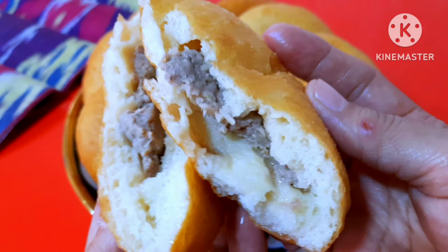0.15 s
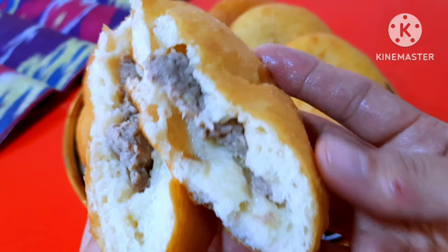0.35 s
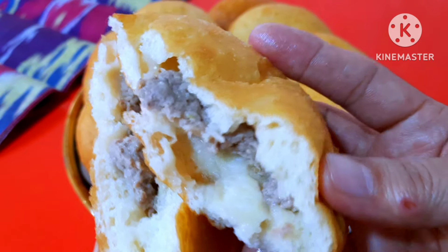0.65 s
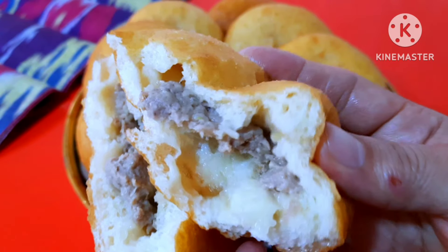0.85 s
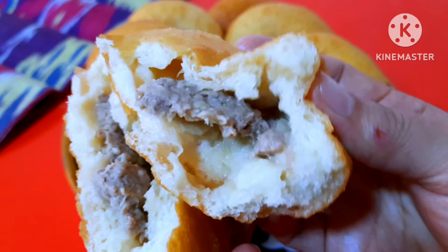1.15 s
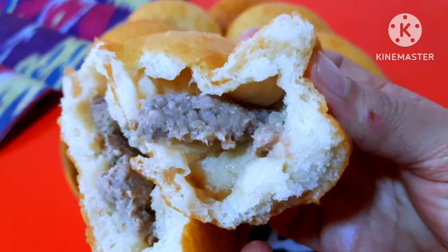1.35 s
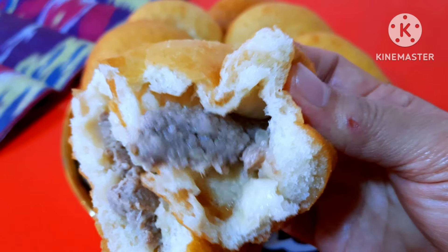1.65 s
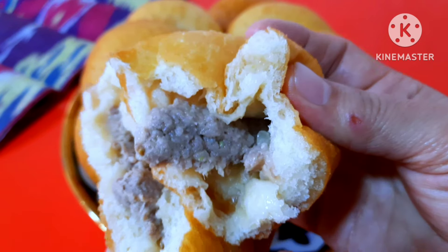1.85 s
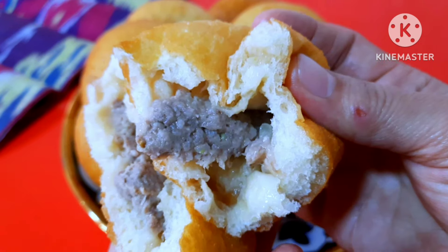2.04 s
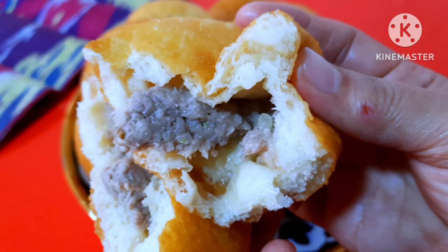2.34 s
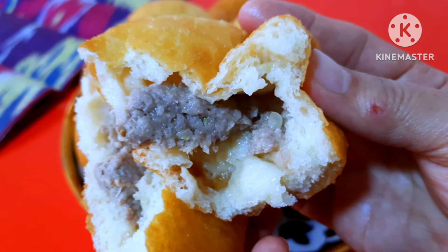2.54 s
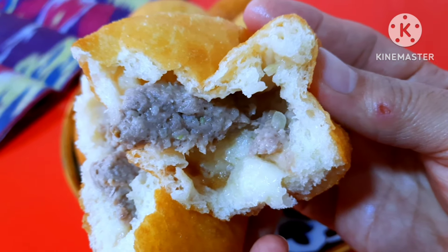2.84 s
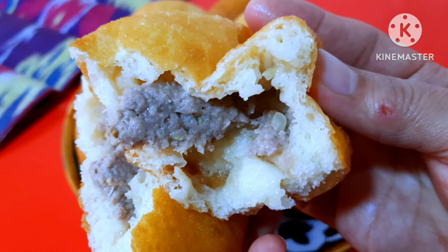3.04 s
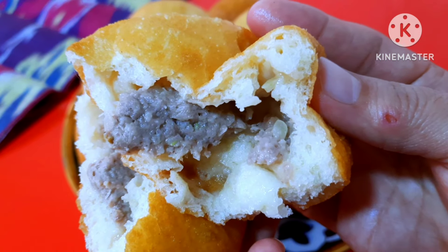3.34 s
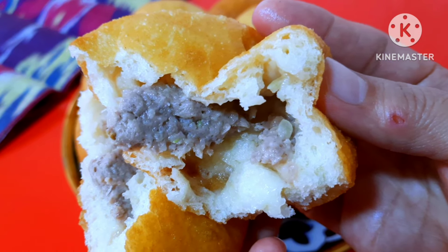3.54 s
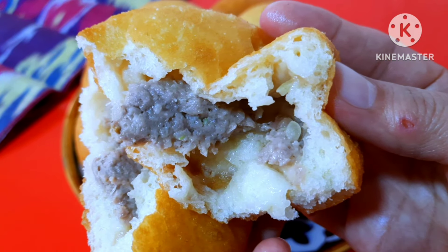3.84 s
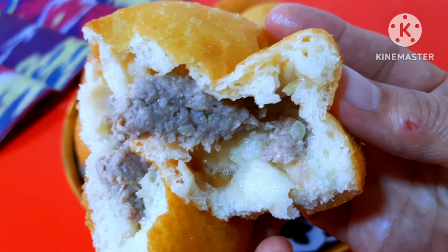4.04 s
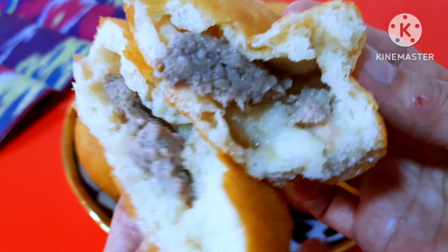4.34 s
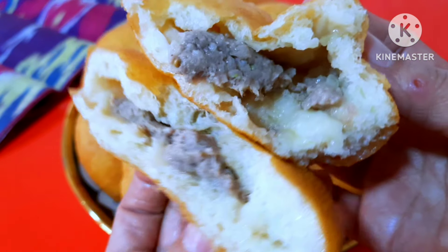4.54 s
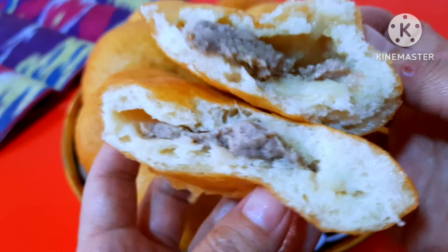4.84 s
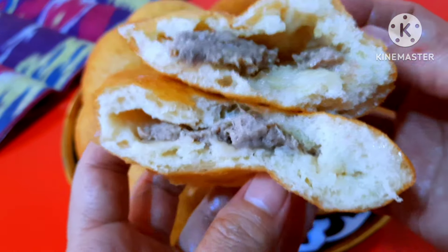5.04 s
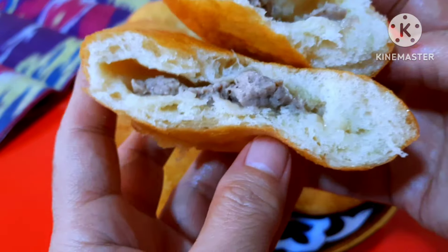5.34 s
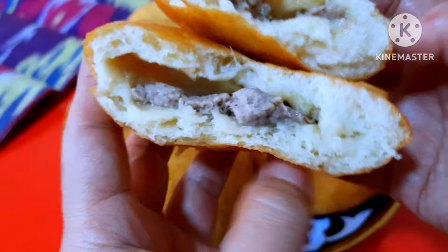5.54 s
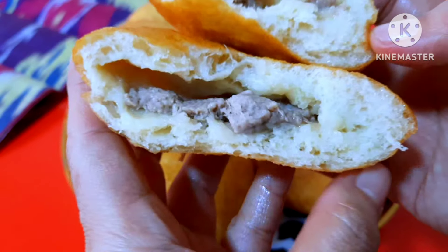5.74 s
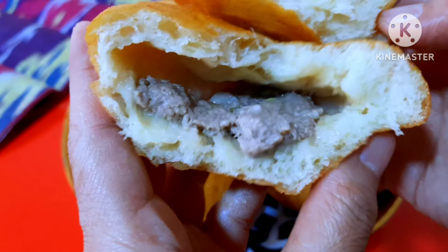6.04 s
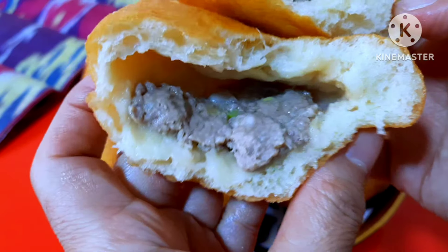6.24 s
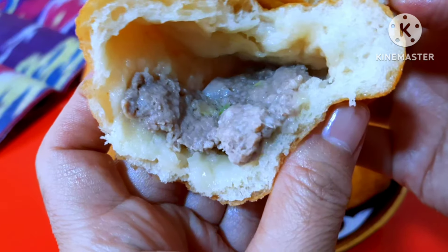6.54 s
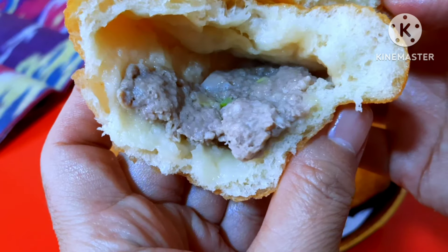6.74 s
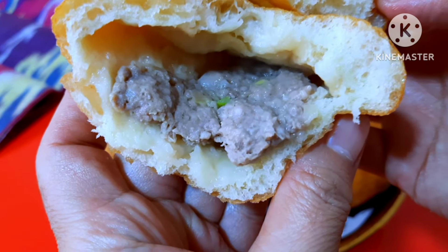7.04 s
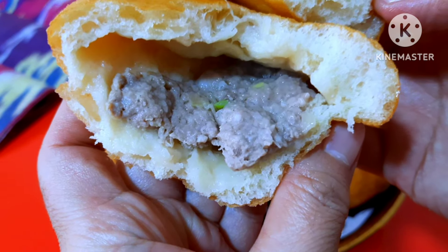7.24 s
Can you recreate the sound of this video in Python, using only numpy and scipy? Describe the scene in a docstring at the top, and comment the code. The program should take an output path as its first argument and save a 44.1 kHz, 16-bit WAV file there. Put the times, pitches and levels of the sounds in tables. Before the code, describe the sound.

Hands tear open a fried dough pie up close, soft crumb ripping and thin crust snapping over a steady low hum

```python
"""Hands pull a fried dough pie close to a phone: from the start the crumb tears in dull bursts of grainy noise
and tiny crust pops ring for a few cycles, over low outdoor rumble, hiss and a motor hum of three wavering sines.
Soon the crust snaps: a knock of the shell with a bright crack. Near 2.7 s a far bird chirps in gliding whistles;
the hands then nearly rest, and from about 4 s they tear and snap densely again before a last soft pull and chirp."""
import sys
import numpy as np
from scipy import signal
from scipy.fft import rfft, irfft, next_fast_len
from scipy.io import wavfile
from scipy.ndimage import uniform_filter1d, map_coordinates

SR = 44100
rng = np.random.default_rng(int(sys.argv[2]) if len(sys.argv) > 2 else 0)


def wav_record(signal):
    """Record a signal, one row per channel, as 16-bit PCM in the file named by sys.argv[1]."""
    frames = np.transpose(np.atleast_2d(signal))
    bounded = np.clip(frames, -1, 1)
    # unit amplitude maps onto the largest positive 16-bit level
    quanta = np.round(bounded * 32767).astype(np.int16)
    wavfile.write(sys.argv[1], SR, quanta)


N = 325458
LAG_S = .00015  # scale of the random time offset between the two ports


def amp(db):
    """Decibels to linear amplitude."""
    return 10 ** (np.asarray(db) / 20)


def unit(x):
    """Scale to an rms of 1."""
    return x / np.sqrt(np.mean(x ** 2) + 1e-20)


def along(points, hz):
    """Read a curve of (Hz, value) points on a log frequency axis."""
    point_hz, values = np.transpose(points)
    return np.interp(np.log(hz + 1), np.log(point_hz + 1), values)


def curves(rows):
    """One value per sample for each column after the time."""
    times_s, *columns = np.transpose(rows)
    return [np.interp(np.arange(N) / SR, times_s, column) for column in columns]


def wobble(rate):
    """A smooth random curve, rate knots a second."""
    knots = rng.standard_normal(int(N * rate / SR) + 4)
    return map_coordinates(knots, [np.arange(N) * rate / SR])


def filtered(x, response):
    """Multiply the spectrum of x by a response given as a function of frequency."""
    m = next_fast_len(N + SR // 2)
    return irfft(rfft(x, m) * response(np.fft.rfftfreq(m, 1 / SR)), m)[..., :N]


def spread(pair, gain, alike):
    """Mix two unrelated signals into a coloured left and right of joint rms 1, as alike as the curve asks."""
    def mid_side_gain(hz):
        turn = np.arccos(np.clip(along(alike, hz), -1, 1)) / 2
        return gain(hz) * np.array([np.cos(turn), np.sin(turn)])

    mid, side = filtered(pair, mid_side_gain)
    return unit(np.array([mid + side, mid - side]))


def bursts():
    """Envelopes of body, crumb, crust and fizz: each tear swells and fades as a bell, and powers add."""
    # tears of the dough: peak_s, length_s, crumb_level_db, dryness_db (crust over crumb)
    tears = [(0, 0.058, -40, -4), (0.138, 0.17, -67.5, -2.5), (0.279, 0.1, -52, -5.5),
             (0.33, 0.056, -46, -5.5), (0.377, 0.091, -58, -20), (0.467, .066, -53, 2.5),
             (0.579, 0.047, -58, 7), (0.658, 0.031, -51.5, -1), (0.712, 0.066, -46, -6.5),
             (0.782, .043, -46.5, -5.5), (0.852, 0.056, -60, -1), (0.953, 0.1, -64, 8),
             (1.063, 0.043, -48, 3.5), (1.177, 0.074, -55, 6.5), (1.221, 0.038, -60, 12.5),
             (1.331, 0.08, -60.5, 8.5), (1.457, 0.058, -68.5, 10.5), (1.575, 0.092, -58.5, 4),
             (1.698, .041, -64.5, 8), (1.771, .05, -57.5, 3.5), (1.812, 0.057, -60, 8),
             (1.937, 0.2, -70.5, 5), (2.221, 0.036, -55, -12), (2.36, 0.28, -71, 5),
             (2.471, .087, -63.5, -2), (2.544, 0.053, -64, 0.5), (2.643, .063, -69.5, -4),
             (2.713, 0.1, -77, 9), (3.692, 0.034, -63.5, -8), (4.048, 0.039, -62, -20),
             (4.157, 0.074, -64, -0.5), (4.267, 0.037, -48.5, 0), (4.322, 0.047, -56.5, 3.5),
             (4.375, 0.024, -53, 3.5), (4.42, 0.071, -59.5, 0.5), (4.526, 0.065, -71.5, 14),
             (4.597, 0.043, -45, -4.5), (4.723, 0.056, -39, -2), (4.784, 0.085, -47, -4),
             (4.879, 0.038, -42.5, -4), (4.932, 0.051, -57, -2), (4.991, 0.016, -47, 3.5),
             (5.028, 0.062, -60.5, 4.5), (5.142, 0.051, -51, 2), (5.183, 0.056, -40, -0.5),
             (5.285, 0.043, -49.5, 0), (5.35, 0.079, -70.5, 11.5), (5.467, 0.16, -67.5, 2.5),
             (5.554, 0.084, -56.5, 4), (5.639, .068, -43, 3.5), (5.746, 0.048, -56, 5),
             (5.79, .095, -60.5, 10), (5.871, 0.049, -58.5, 10), (5.986, 0.055, -60, 3),
             (6.034, 0.042, -47, 1.5), (6.123, 0.043, -41, 2.5), (6.206, 0.098, -58, 1),
             (6.252, 0.083, -55, 0.5), (6.36, 0.12, -77.5, 13.5), (6.485, 0.075, -56, -1),
             (6.529, 0.05, -54, 3.5), (6.595, 0.06, -71.5, 11), (6.718, 0.057, -66, 4),
             (6.785, 0.081, -76, 8.5), (7.198, 0.18, -71.5, 5)]
    rise_share = 0.4  # of a burst's length
    power, t = np.zeros((4, N)), np.arange(N) / SR
    for s, length, crumb_db, dry_db in tears:
        near = slice(max(round((s - .3) * SR), 0), round((s + .3) * SR))
        side_share = np.where(t[near] < s, rise_share, 1 - rise_share)
        away = np.abs(t[near] - s) / side_share / length
        # a dry tear moves less body and gives more crust and fizz
        over_crumb_db = np.array([-4.5 - 0.29 * dry_db, 0, dry_db, -7.5 + 1.6 * dry_db])
        power[:, near] += amp(crumb_db + over_crumb_db[:, None] - 7.4 * away ** 1.16) ** 2
    return np.sqrt(power)


def breaks(rate, size_db, life):
    """Tiny breaks of uneven size, rate a second, each a puff that starts at once and decays over life seconds."""
    sizes = amp(size_db * np.minimum(rng.exponential(size=N), 3))
    starts = (rng.random(N) < rate / SR) * sizes
    return unit(signal.lfilter([1], [1, -np.exp(-1 / (life * SR))], starts))


def patchy(pair, depth_db):
    """The hollow between the hands keeps changing shape: random gain in patches of time and frequency."""
    z = signal.stft(pair, nperseg=256)[2]
    field = uniform_filter1d(rng.standard_normal(z.shape[1:]), size=2, axis=0)  # across frequency
    field = uniform_filter1d(field, size=9, axis=1)  # across time
    return signal.istft(z * amp(depth_db * unit(field)), nperseg=256)[1][:, :N]


def rustle(spectrum, grain, patchy_db):
    """Coloured noise under a grainy envelope that both ports hear alike."""
    # how alike the two ports hear the pie: frequency_hz, likeness (0 to 1)
    pie_alike = [(500, 0.45), (1500, 0.25), (2800, 0.012), (15000, 0.012)]
    pair = patchy(grain * rng.standard_normal((2, N)), patchy_db)
    return spread(pair, lambda hz: amp(along(spectrum, hz)), pie_alike)


def tearing():
    """The thick body and soft crumb rip low, dry crust crackles high; the same breaks excite them all."""
    # colours of the tearing layers, from low to high: frequency_hz, relative_level_db (per Hz)
    body_colour = [(520, -21), (740, -7.5), (850, -3), (1200, -2), (1500, -1.5), (2200, -42)]
    crumb_colour = [(800, -16), (1250, -10.5), (1600, 1), (2200, -2.5), (3400, -8.5), (4500, -18)]
    crust_colour = [(2200, -25), (3200, -15), (5000, -9), (7000, -6), (8800, -7.5), (10500, -20)]
    fizz_colour = [(8500, -15), (10300, -7), (12500, -5.5), (15500, -9)]
    # a narrow band that stands out in some tears: frequency_hz, relative_level_db (per Hz)
    ring_colour = [(2500, -34), (3200, -2.5), (3600, -6.5), (4100, -6.5), (5200, -23.5)]
    # slow change of colour: time_s, extra_body_db, relative_ring_db
    tone = [(0, -0.5, -0.5), (.9, -3, 3.5), (1.7, 7, 0), (2.6, 5.5, -7), (4.1, 3.5, 4.5), (4.5, 4, 0),
            (5.4, -3, -20), (6.2, 2, -21), (7.38, 5, -13)]
    body, crumb, crust, fizz = bursts() * amp(0.69 * wobble(60))
    extra_body_db, ring_db = curves(tone)
    crumbs = breaks(70, size_db=3.5, life=0.025)
    dense = breaks(600, size_db=2.0, life=0.0014)
    ticks = breaks(41, size_db=-6.5, life=0.00073)
    ring_level = amp(ring_db - 9) * np.hypot(crumb, crust)
    ring = ring_level * rustle(ring_colour, 1.0 + dense + 1.2 * crumbs, patchy_db=4.0)
    body_grain = 1.7 + dense + 0.24 * ticks
    thick = amp(extra_body_db) * body * rustle(body_colour, body_grain, patchy_db=3.5)
    crumb_grain = 2.4 + dense + 0.23 * crumbs + 0.31 * ticks
    soft = crumb * rustle(crumb_colour, crumb_grain, patchy_db=3.0)
    crust_grain = 1.4 + dense + 0.83 * crumbs + 0.73 * ticks
    dry_crackle = crust * rustle(crust_colour, crust_grain, patchy_db=4.5)
    fizz_grain = 1.5 + dense + 0.48 * crumbs + 0.5 * ticks
    bright = fizz * rustle(fizz_colour, fizz_grain, patchy_db=3.5)
    return ring + thick + soft + dry_crackle + bright


def pops():
    """Small blisters of crust pop at random, each a few cycles at its own pitch, louder while the dough tears."""
    # limits of the pop pitch: lowest_hz, highest_hz
    low_hz, high_hz = [1200, 9000]
    pops_per_s, life_cycles = 60, 2  # over its life a pop falls to about a twentieth
    when, note, size, side = rng.random((int(pops_per_s * N / SR), 4)).T
    start = (when * N).astype(int)
    pitch_hz = low_hz * (high_hz / low_hz) ** note
    t = np.arange(SR // 200) / SR
    tear_level = uniform_filter1d(np.hypot(*bursts()[1:3]), size=SR // 20)[start]  # crumb and crust
    level = tear_level * amp(6.5 - 3 * np.log(size + .01))  # a few pops stand far out
    turns = pitch_hz[:, None] * t
    grains = level[:, None] * np.sin(2 * np.pi * turns) * np.exp(-3 * turns / life_cycles)
    late = np.round((side - .5) * 2 * LAG_S * SR).astype(int)

    def port(sign):
        places = np.abs(start + sign * late)[:, None] + np.arange(len(t))
        return np.bincount(places.ravel(), grains.ravel(), N + SR)[:N]

    return np.array([port(1), port(-1)])


def room():
    """Far rumble swells in the room modes, over slowly varying rumble and steady hiss."""
    # two groups of room modes, lower and upper: centre_hz, width_hz
    modes_hz = [
        [(305, 25), (345, 19.7)],
        [(462, 63)],
    ]
    # resting level of each group: level_db
    rest_db = [-65.5, -76.5]
    # low swells: peak_s, length_s, lower_rise_db, upper_rise_db
    swells = [(.76, 0.15, 3.5, 17), (1.055, 0.29, 18.5, 20), (1.688, 0.26, 5.5, 10), (2.85, 0.6, 5.5, 3),
              (4.404, 0.26, 4.5, -1), (5.09, 0.59, 5.5, 6), (5.83, 0.17, 6, 5), (6.286, 0.13, 11.5, 8),
              (6.953, 0.36, 5.5, 2)]
    # level of the far rumble: time_s, level_db
    traffic = [(0, -54.5), (1.2, -52), (2.4, -53.5), (3.5, -55.5), (4.7, -51.5), (6, -54.5), (7.38, -55)]
    # colours of rumble and hiss: frequency_hz, relative_level_db (per Hz)
    rumble_colour = [(22, -3), (40, -24), (64, -3), (85, -6.5), (120, -9.5), (139, 0.5), (160, -14),
                     (200, -22.5), (260, -31.5), (340, -37), (450, -37.5), (900, -34), (1500, -80)]
    hiss_colour = [(350, -1.5), (600, -9), (823, -12.5), (1310, -14.5), (2610, -15), (2800, -17),
                   (3890, -21), (4160, -23), (7020, -23.5), (14100, -20), (16000, -20.5)]
    # how alike the two ports hear the room: frequency_hz, likeness (0 to 1)
    room_alike = [(60, 0.33), (130, 0.64), (300, 0.6), (600, 0.24), (1300, 0.016), (15000, 0.018)]

    def noise(gain):
        return spread(rng.standard_normal((2, N)), gain, room_alike)

    def resonance(modes):
        return lambda f: sum(1 / (1 + (2 * (f - hz) / width) ** 2) for hz, width in modes)

    t = np.arange(N) / SR
    swells_db = np.zeros((2, N))
    for s, length, *rise_db in swells:
        swells_db += np.array(rise_db)[:, None] * np.exp(-(2 * (t - s) / length) ** 2)
    drone = 0
    for modes, db, swell_db in zip(modes_hz, rest_db, swells_db):
        drone = drone + amp(db + swell_db + 1.6 * wobble(3.7)) * noise(resonance(modes))
    rumble_level = amp(curves(traffic)[0] + 1.2 * wobble(3.14))
    rumble = rumble_level * noise(lambda f: amp(along(rumble_colour, f)))
    hiss = amp(-61.5) * noise(lambda f: amp(along(hiss_colour, f)))
    return drone + rumble + hiss


def hum():
    """Three slightly unsteady machine tones; the weaker ones waver more."""
    # mean pitches of a motor, a mains buzz and a second machine: pitch_hz
    tones_hz = [49.38, 99.9, 58.5]
    # level of each tone before its waver: time_s, level_db
    motor = [(0, -36), (.35, -34.5), (.88, -36), (1.2, -35.5), (1.95, -37), (2.3, -36), (3, -37),
             (3.3, -35), (3.7, -37), (4.7, -35), (5.4, -36), (7.38, -37)]
    buzz = [(0, -64), (.9, -62), (1.1, -52.5), (2, -70), (2.3, -52), (2.55, -61), (2.68, -44), (3.3, -59),
            (4.8, -57), (4.97, -47), (5.24, -55), (5.36, -68), (5.8, -52.5), (6.7, -50.5), (7, -48),
            (7.38, -50)]
    neighbour = [(0, -63), (1.05, -68), (1.2, -47), (1.35, -63), (2.05, -72), (2.3, -46), (2.8, -52),
                 (3, -56), (4.5, -58), (6.7, -82), (7.38, -37.5)]
    levels_db = curves(motor) + curves(buzz) + curves(neighbour)
    out = np.zeros(N)
    for hz, db, waver_db in zip(tones_hz, levels_db, [.9, 2.5, 1.2]):
        level = np.sqrt(2) * amp(db + waver_db * wobble(8.7))  # rms to peak
        pitch = hz * (1 + 0.0046 * wobble(6.1))
        out += level * np.sin(2 * np.pi * np.cumsum(pitch) / SR)
    return out


def snaps():
    """Each snap knocks the shell for a few cycles and spits a bright crack; the light shell makes no bass."""
    # snaps of the crust: start_s, relative_crack_db, crack_pitch_hz, relative_knock_db
    snap_rows = [(.2166, -62, 4200, -42.5), (0.307, -36, 6800, -31.5), (0.3366, -29, 5870, -12.5),
                 (.5714, -43, 6300, -46), (.7677, -50, 5180, -32), (.782, -49, 7420, -28.5),
                 (0.8733, -49, 6810, -45), (.914, -41.5, 7400, -65), (1.046, -42, 5620, -52),
                 (1.077, -39, 3930, -49), (1.2136, -31, 5800, -56), (1.2965, -50, 7190, -61),
                 (1.3336, -33.5, 7250, -62), (1.468, -38, 7160, -69), (1.7835, -39, 7750, -50),
                 (1.8019, -33.5, 7240, -67), (1.915, -54, 4000, -62), (1.94, -53, 7000, -60),
                 (2.0705, -51, 7310, -47), (2.222, -45, 4400, -36), (2.3123, -60, 4290, -47),
                 (2.368, -51.5, 8200, -72), (2.7032, -45, 8250, -66), (4.2464, -38.5, 6800, -63),
                 (4.371, -42, 6950, -56), (4.581, -45, 6800, -42), (4.643, -44, 7000, -56),
                 (4.6919, -31, 8200, -38), (4.7277, -44, 6800, -32), (4.763, -36, 8240, -40),
                 (4.8628, -39, 5310, -42), (4.8839, -27, 5250, -40), (4.9597, -44, 7800, -57),
                 (4.9824, -33.5, 7160, -48), (5.1365, -31.5, 8600, -47), (5.1562, -29, 5260, -36),
                 (5.246, -35.5, 6560, -46), (5.562, -44, 8000, -60), (5.732, -58, 4000, -46),
                 (5.8394, -47, 8250, -59), (5.8608, -33.5, 7500, -62), (5.998, -36.5, 7750, -50),
                 (6.0254, -33.5, 7930, -51), (6.114, -36.5, 7800, -33), (6.205, -46, 6500, -60),
                 (6.258, -60, 4000, -43), (6.268, -60, 4000, -45), (6.2981, -43, 8460, -58),
                 (6.476, -32.5, 8250, -36.5), (6.704, -44.5, 8440, -59), (6.7691, -47, 6300, -50),
                 (7.126, -56, 7400, -58), (7.189, -50, 7500, -50), (7.255, -51, 7250, -69)]
    knock_left_db, crack_left_db, scatter_db = 8.5, 2.5, -0.5  # left over right; scale of its random change
    out, t = np.zeros((2, N + SR)), np.arange(SR // 40) / SR
    sides = np.array([[.5], [-.5]])  # left, right
    for s, crack_db, crack_hz, knock_db in snap_rows:
        note, lean, turn = rng.standard_normal(3)
        knock_hz = 1660 * np.exp(0.072 * note)  # the shell's note differs from snap to snap
        knock_level = amp(knock_db + 4.5 - 60 * t / 0.0031) * (1 - np.exp(-t / 0.00017))
        knock = np.sin(2 * np.pi * knock_hz * t) * knock_level
        ring = np.sin(2 * np.pi * crack_hz * (t + sides * LAG_S * turn))
        spit = uniform_filter1d(rng.standard_normal(len(t)), size=2)  # softens the top treble
        spit = np.array([spit, np.roll(spit, round(LAG_S * turn * SR))])
        crack = amp(crack_db - 2.5 - 60 * t / 0.0066) * (1.6 * ring + 1.3 * spit)
        crack += amp(crack_db - 18 - 60 * t / 0.066) * spit  # crumbs fall after it
        both = knock * amp(sides * knock_left_db) + crack * amp(sides * crack_left_db)
        start = round(s * SR)
        out[:, start:start + len(t)] += both * amp(sides * scatter_db * lean)
    return signal.sosfilt(signal.butter(5, 800, "high", fs=SR, output="sos"), out[:, :N])


def bird():
    """Thin gliding whistles, blurred by distance: level and pitch flutter apart in the two ports."""
    # chirps: start_s, length_s, start_pitch_hz, glide_hz_per_s, relative_level_db
    chirps = [(2.718, 0.16, 3070, -300, -67), (2.73, .11, 3550, -300, -67), (3.36, 0.074, 4200, -2000, -74),
              (3.42, 0.068, 3400, 0, -67), (7.257, .13, 3520, 200, -63.5),
              (7.307, 0.098, 3450, -10000, -64)]
    out, t = np.zeros((2, N)), np.arange(N) / SR
    for s, length, hz, glide, db in chirps:
        flutter = np.array([wobble(300), wobble(300)])
        waver = np.array([wobble(300), wobble(300)])
        through = np.clip((t - s) / length, 0, 1)
        pitch = hz + glide * length * through + 60 * waver
        level = amp(db) * np.sin(np.pi * through) ** .6 * (.7 + 0.78 * flutter)
        out += level * np.sin(2 * np.pi * np.cumsum(pitch, axis=1) / SR)
    return out


def scene():
    """Tearing, pops and room lean to the left port by frequency; snaps, hum and bird join as they are."""
    # left over right: frequency_hz, difference_db
    left_lean = [(60, 12.5), (180, -1.5), (550, 4.5), (1650, 3.5), (4970, 2.5), (15000, 0)]
    leaning = tearing() + pops() + room()
    leaning = filtered(leaning, lambda hz: amp(along(left_lean, hz) * np.array([[.5], [-.5]])))
    return leaning + snaps() + hum() + bird()


def record(dry):
    """The microphone ports dip in the high treble; the top fades out around the band limit."""
    top_hz = 15700  # middle of a 600 Hz wide fade

    def response(hz):
        dip = amp(-7 / (1 + ((hz - 9500) / 500) ** 2))
        return dip * np.clip((top_hz + 300 - hz) / 600, 0, 1) ** 2

    return filtered(dry, response)


dry = scene()
out = record(dry)
wav_record(out)
```